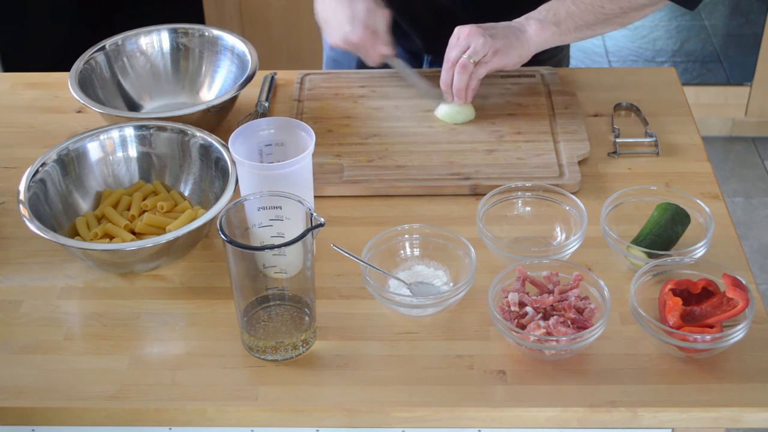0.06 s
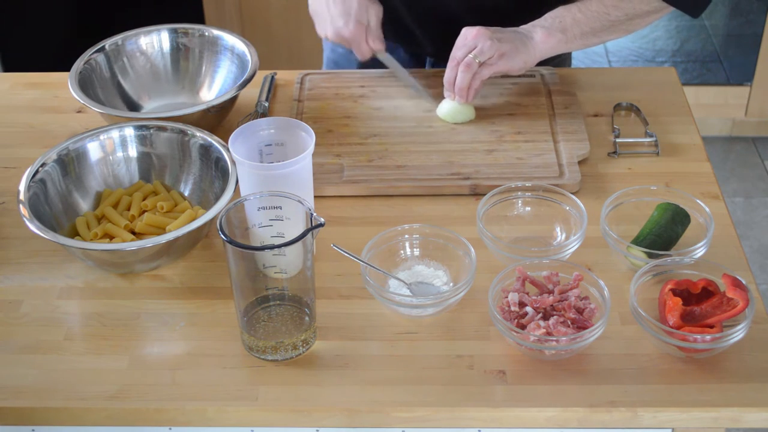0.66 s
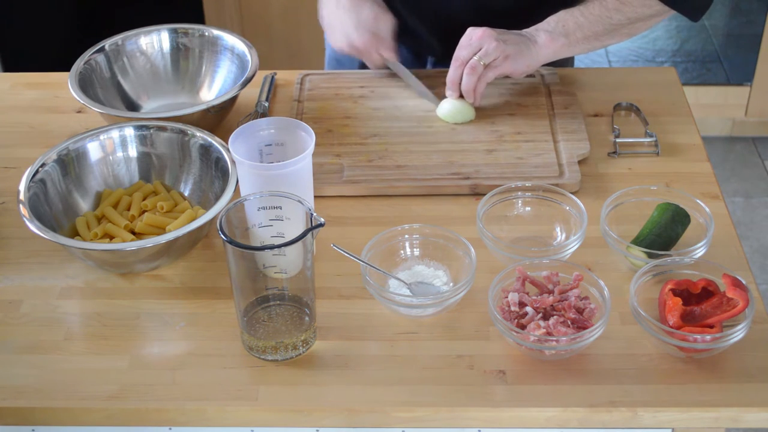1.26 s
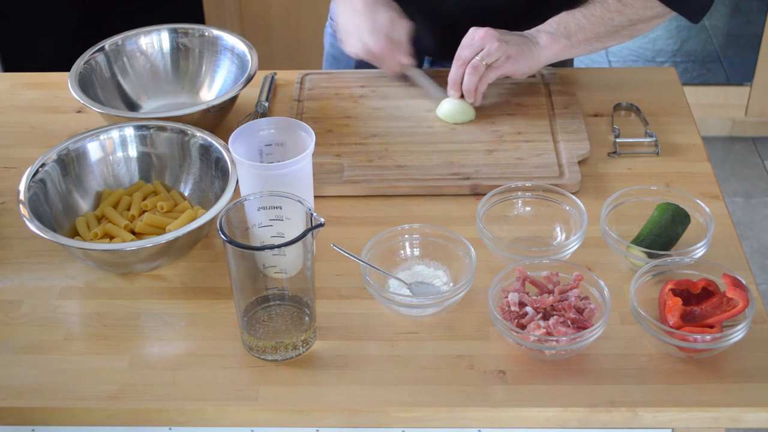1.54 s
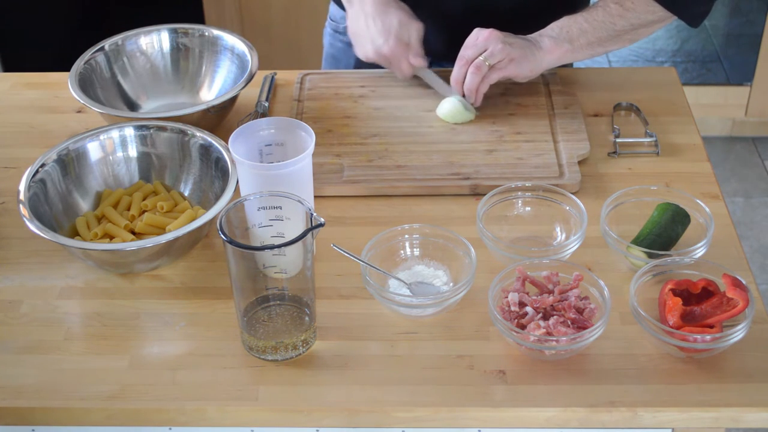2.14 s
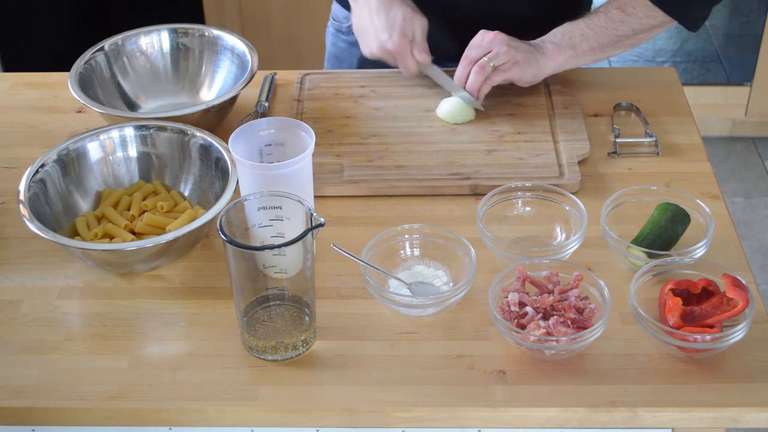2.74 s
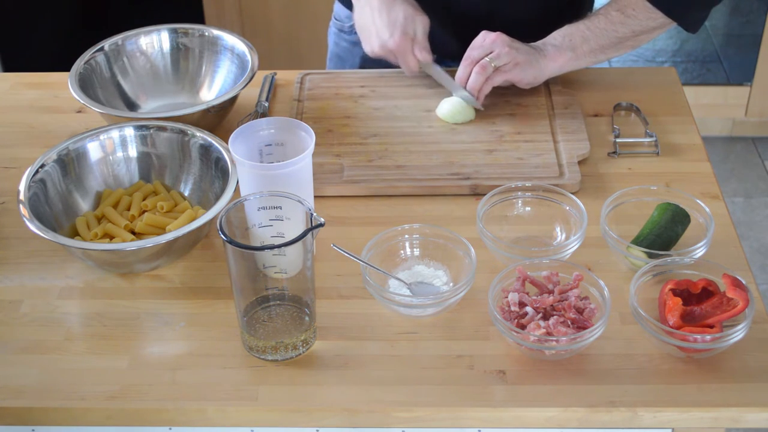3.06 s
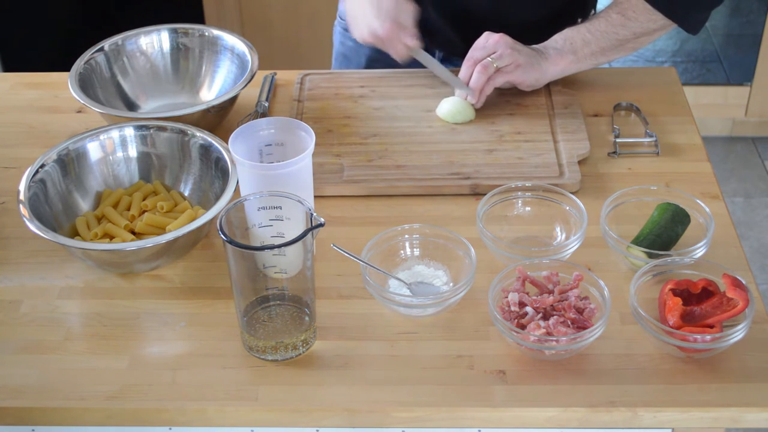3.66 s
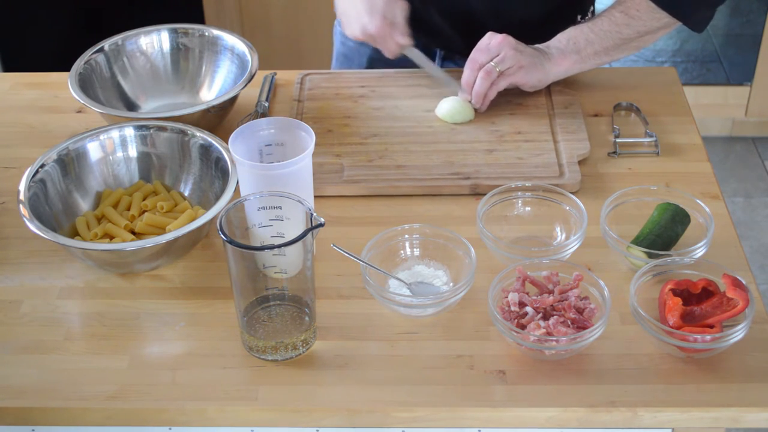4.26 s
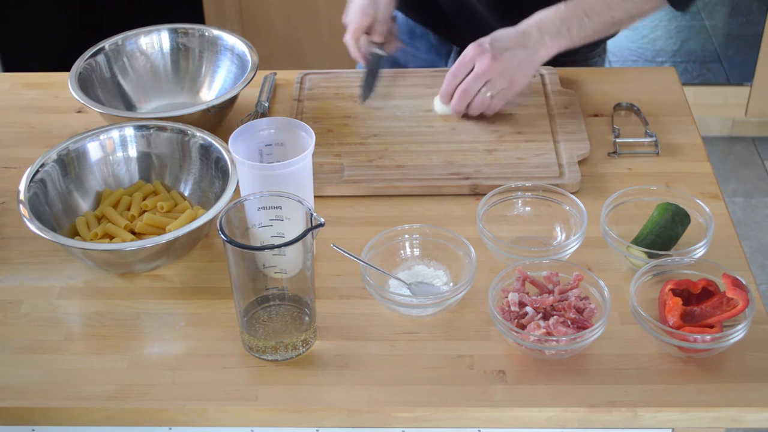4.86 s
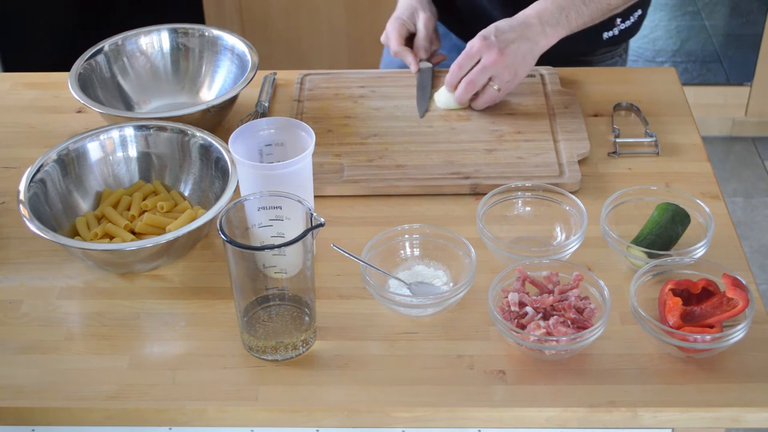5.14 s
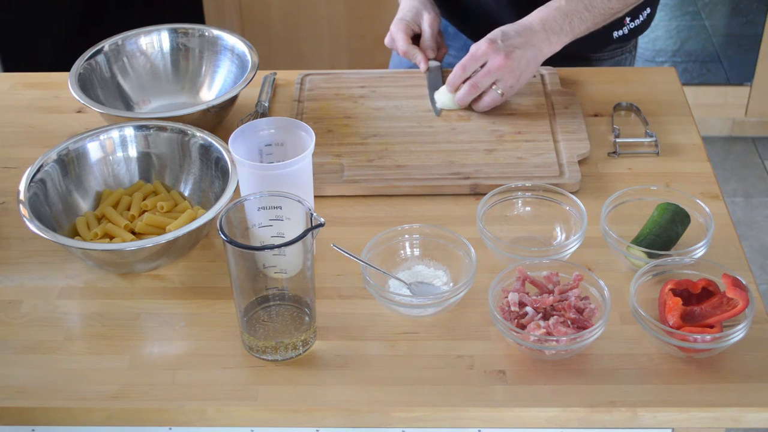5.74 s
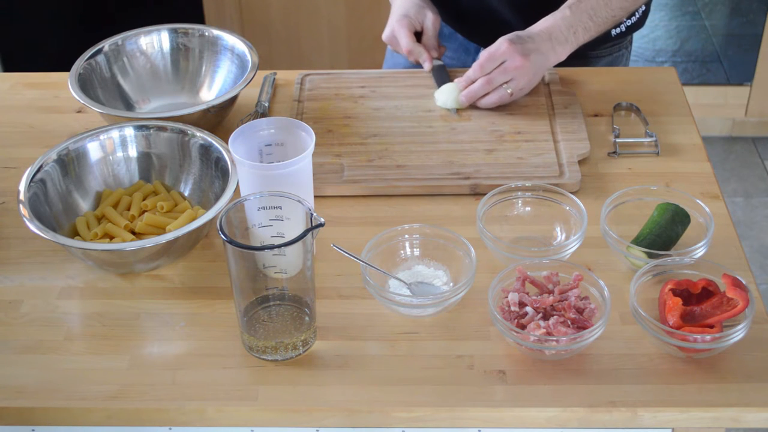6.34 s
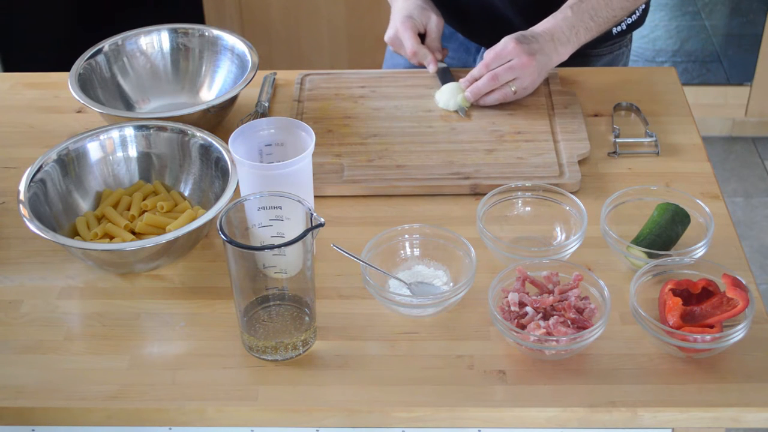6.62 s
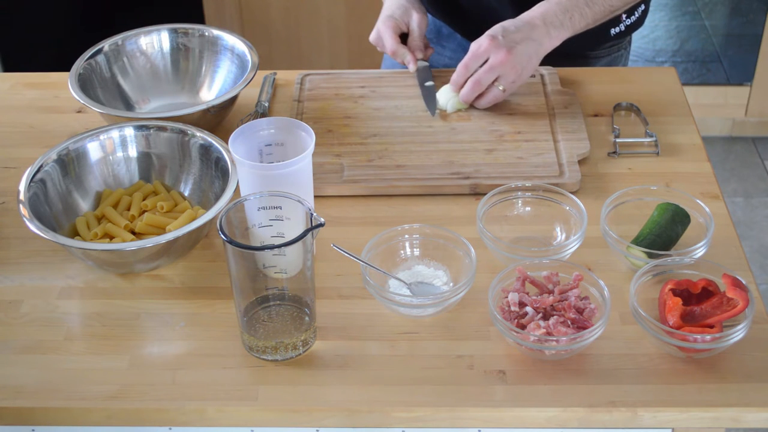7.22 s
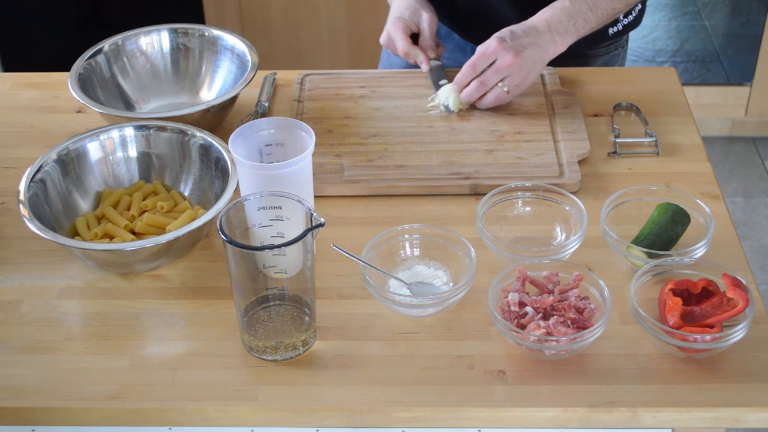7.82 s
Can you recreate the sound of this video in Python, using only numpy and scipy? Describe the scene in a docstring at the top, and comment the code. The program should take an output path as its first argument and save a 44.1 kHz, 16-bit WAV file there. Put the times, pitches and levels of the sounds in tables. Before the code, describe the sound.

Crunchy onion slicing opens at about three strokes a second, the blade knocking on a wooden chopping board and shaking the table beneath. Then the onion bumps softly on the wood, the knife tip scrapes and clicks twice, and the blade works through in small, much quieter crackling pushes. Heard from nearby, the kitchen adds a short echo, with faint steady fan noise and a very high electronic whine behind.

```python
"""A chef's knife slices an onion on a wooden board, on a kitchen table.
Fifteen quick strokes crunch as cells pop and layers burst; each ends in a knock that rings the board
and shakes the table. Hand and onion bump, the knife tip taps twice, and slow lengthwise cuts rasp on.
The room reverberates; a fan and a thin electronic whine lie behind."""
import sys
import numpy as np
from scipy import signal
from scipy.fft import rfft, irfft
from scipy.io import wavfile
from scipy.ndimage import uniform_filter1d

SR = 44100
rng = np.random.default_rng(int(sys.argv[2]) if len(sys.argv) > 2 else 0)


def dump(signal):
    """Clip the signal to [-1, 1] and save it as 16-bit WAV at the path in sys.argv[1]."""
    limited = np.clip(np.atleast_2d(signal).T, -1, 1)
    pcm = np.round(limited * 32767).astype(np.int16)
    wavfile.write(sys.argv[1], SR, pcm)


N = 356769


def gain_of(db):
    """Decibels to amplitude."""
    return 10 ** (np.asarray(db) / 20)


def unit_rms(x):
    """Scale to rms 1."""
    return x / np.sqrt(np.mean(x ** 2) + 1e-20)


def curve_at(points, hz):
    """Interpolate on a log-frequency axis."""
    freq_hz, value = np.transpose(points)
    return np.interp(np.log(hz + 1), np.log(freq_hz + 1), value)


def seconds(length_s):
    """Time axis."""
    return np.arange(int(length_s * SR)) / SR


def add(mix, start_s, sound):
    """Mix in place at start_s."""
    part = mix[max(round(start_s * SR), 0):][:len(sound)]
    part += sound[:len(part)]


def colour(x, spectrum, size=4096):
    """Minimum-phase filter of unit energy: the spectrum sets shape only."""
    hz = abs(np.fft.fftfreq(size, 1 / SR))
    log_gain = np.log(gain_of(np.maximum(curve_at(spectrum, hz), -100)))
    impulse = np.fft.ifft(np.exp(np.conj(signal.hilbert(log_gain)))).real[:size // 2]
    return signal.oaconvolve(x, impulse / np.linalg.norm(impulse))[:len(x)]


def resonate(x, hz, width_hz):
    """Double-pole resonance with steep skirts."""
    pole = np.exp((2j * np.pi * hz - np.pi * width_hz) / SR)
    return signal.lfilter([(1 - abs(pole)) ** 2], np.poly([pole, pole]), x).real


def swell(t, rise_s):
    """Envelope: peaks at 1 at rise_s, then decays."""
    return t / rise_s * np.exp(1 - t / rise_s)


# Fan air noise: freq_hz, gain_db
FAN_SPECTRUM = [(15, -45), (25, -16), (77, -4.5), (118, -10.5), (191, -12), (278, -13), (318, -9.5),
                (588, -13.5), (673, -14.5), (729, -12.5), (1810, -15.5), (2500, -16), (2930, -7.5),
                (3350, -15.5), (15000, -25.5)]
# Fan resonances: pitch_hz, width_hz, level_db
FAN_HUMS = [(311, 28, -72.5), (1580, 220, -62.5), (2880, 180, -65.5), (5260, 230, -68.5)]

def fan(air_db=-51):
    """Steady air noise with narrow hums."""
    air = gain_of(air_db) * unit_rms(colour(rng.standard_normal(N), FAN_SPECTRUM))
    for pitch_hz, width_hz, level_db in FAN_HUMS:
        air += gain_of(level_db) * unit_rms(resonate(rng.standard_normal(N), pitch_hz, width_hz))
    return air


def whine(pitch_hz=15681, level_db=-66.5):
    """Thin, steady electronic tone."""
    return gain_of(level_db) * unit_rms(np.sin(2 * np.pi * pitch_hz * np.arange(N) / SR))


# Room decay: freq_hz, t60_s
ROOM_DECAY = [(100, 0.5), (300, 0.49), (1000, 0.41), (3000, 0.38), (6000, 0.3), (14000, 0.18)]
# Early reflections: delay_s, gain
REFLECTIONS = [(.0133, .24), (.0165, .08), (.0225, .08), (.0305, .12)]

def kitchen(x, tail_db, build_s=0.0048):
    """Direct sound, near reflections and a dense tail whose treble dies first."""
    hz, t, bands = signal.stft(rng.standard_normal(SR), SR, nperseg=256)
    decay = gain_of(-60 * t / curve_at(ROOM_DECAY, hz)[:, None])
    tail = signal.istft(bands * decay, SR, nperseg=256)[1]
    tail *= 1 - np.exp(-(np.arange(len(tail)) / SR / build_s) ** 2)
    response = gain_of(tail_db) * tail / np.linalg.norm(tail)
    for delay_s, gain in REFLECTIONS:
        add(response, delay_s, np.array([gain]))
    return x + signal.fftconvolve(x, response)[:N]


def clatter(envelope, grit):
    """Short train of contacts under an envelope, spectrum flattened."""
    x = envelope * grit
    for _ in range(8):
        phase = np.angle(rfft(x * envelope ** .25))
        x = irfft(np.exp(1j * phase), len(envelope))
    return unit_rms(x) * np.sqrt(np.mean(envelope ** 2))


def impact(envelope, spectrum):
    """Coloured shower of contacts."""
    return colour(clatter(envelope, rng.standard_normal(len(envelope))), spectrum)


def ring(t, modes, scatter_db, detune):
    """Decaying modes; each blow shares its energy among them differently."""
    hz, db, t60_s = np.transpose(modes)[:, :, None]
    size, shift, phase = rng.standard_normal((3, len(modes), 1))
    weight = gain_of(db + scatter_db * size)
    waves = np.sin(2 * np.pi * (hz * (1 + detune * shift) * t + phase)) * gain_of(-60 * t / t60_s)
    return (weight * waves).sum(0) / np.linalg.norm(weight)


# Modes of the table under the board: pitch_hz, weight_db, t60_s
TABLE_MODES = [(70.8, -14, 0.93), (82.6, -8, 0.41), (104.5, -24, 0.3), (145, -4, 0.22), (188.8, 3.5, .16),
               (270, -0.5, 0.14), (340.8, 4.5, 0.25), (401.6, 2, .22)]

def table_thud(t, rise_s=0.014):
    """The table takes up a push slowly and rings low."""
    return ring(t, TABLE_MODES, scatter_db=-2.0, detune=0.0076) * (1 - np.exp(-(t / rise_s) ** 2))


# Modes of the board: pitch_hz, weight_db, t60_s
BOARD_MODES = [(576, -15, .15), (830, -10, .1), (900, -10, .12), (953, -11, .28), (1012, -9, .3),
               (1076, 3, .25), (1156, -3, .15), (1207, -6, .24), (1298, -9, .15), (1449, 0, .26),
               (1515, -6, .16), (2207, -4, .13), (2325, -7, .13), (2568, -4, .13), (2714, -2, .13),
               (2859, -8, .16), (2989, -7, .15), (3253, -5, .13), (3308, 0, .17), (3526, -2, .11),
               (3667, -2, .12), (4060, -7, .1), (4210, -8, .1)]

def board_ring(t, tilt):
    """The board rings, its modes weighted by the blow's tilt curve."""
    modes = np.array(BOARD_MODES, float)
    modes[:, 1] += curve_at(tilt, modes[:, 0])
    return ring(t, modes, scatter_db=-0.6, detune=0.00067) * (1 - np.exp(-t / 0.00029))


# Hand and onion on the board: start_s, level_db, table_db
BUMPS = [(3.576, -23, -43), (4.486, -21, -34), (5.187, -23.5, -33.5), (7.194, -32, -35.5)]
# Soft contact: freq_hz, gain_db
BUMP_SPECTRUM = [(29, -52), (50, -8), (246, -18), (337, -3), (468, -28.5), (542, -4), (768, -18), (975, -1),
                 (1150, -18), (1430, -15), (4000, -38), (5200, -62), (8800, -120)]

def hand_bumps(contact_gain_db=-9, thud_gain_db=4):
    """Soft bumps shake the table. Returns contacts, rings."""
    contacts, rings, t = np.zeros(N), np.zeros(N), seconds(.6)
    for start_s, level_db, table_db in BUMPS:
        bump = impact(swell(t, 0.0064), BUMP_SPECTRUM)
        add(contacts, start_s, gain_of(level_db + contact_gain_db) * bump)
        add(rings, start_s, gain_of(table_db + thud_gain_db) * table_thud(t, rise_s=0.01))
    return contacts, rings


# Knife tip on the board: start_s, level_db, table_db
TIP_TAPS = [(5.607, -14.5, -35.5), (5.873, -13.5, -36.5)]
# Tip contact: freq_hz, gain_db
TIP_SPECTRUM = [(88, -37), (150, -21), (675, -20), (1030, -3.5), (1240, -9), (1570, 0.5), (1780, -8.5),
                (2300, -3), (3990, -13.5), (4380, -23), (4800, -19), (10200, -46), (12000, -41),
                (15600, -67), (22000, -120)]
# Tip's weighting of the board modes: freq_hz, gain_db
TIP_TILT = [(900, 2.5), (1200, -8), (1500, 5), (2300, 1), (3300, -14)]

def tip_taps(click_gain_db=-4, ring_gain_db=-9, thud_gain_db=4, thud_lag_s=0.0151):
    """The tip clicks on the wood; board and table ring. Returns clicks, rings."""
    clicks, rings, t = np.zeros(N), np.zeros(N), seconds(.6)
    envelope = np.exp(-t / 0.00176) + 0.45 * swell(t, .004)
    for start_s, level_db, table_db in TIP_TAPS:
        add(clicks, start_s, gain_of(level_db + click_gain_db) * impact(envelope, TIP_SPECTRUM))
        add(rings, start_s, gain_of(level_db + ring_gain_db) * board_ring(t, TIP_TILT))
        add(rings, start_s + thud_lag_s, gain_of(table_db + thud_gain_db) * table_thud(t))
    return clicks, rings


# Tip scrapes: centre_s, length_s, level_db
TIP_DRAGS = [(5.368, 0.17, -47.5), (5.482, 0.057, -40.5), (5.749, 0.075, -35.5), (6.008, 0.066, -35.5)]

def tip_drags(gain_db=-3):
    """The tip drags over the wood in short swells of noise."""
    force = np.zeros(N)
    for centre_s, length_s, level_db in TIP_DRAGS:
        add(force, centre_s - length_s / 2, gain_of(level_db + gain_db) * np.hanning(int(length_s * SR)))
    return colour(force * rng.standard_normal(N), TIP_SPECTRUM)


def cell_pops(rate_hz, spread_db):
    """Onion cells pop as random clicks; positive spread makes a few much louder."""
    size = gain_of(spread_db * np.minimum(rng.exponential(1, N), 4))
    return unit_rms(size * rng.choice([-1, 1], N) * (rng.random(N) < rate_hz / SR))


def clumps(depth_db):
    """Gain flutter: cells tear in clumps a few milliseconds long."""
    return gain_of(depth_db * unit_rms(uniform_filter1d(rng.standard_normal(N), size=180)))


# Lengthwise pushes of the blade: start_s, length_s, level_db
PUSHES = [(4.74, 0.21, -48.5), (5.12, 0.34, -55), (5.455, .052, -45), (5.582, 0.057, -41.5),
          (5.704, .058, -43), (5.83, 0.072, -38.5), (5.97, 0.082, -41.5), (6.108, .088, -37.5),
          (6.249, 0.058, -38.5), (6.372, 0.094, -35), (6.51, 0.062, -40), (6.628, 0.08, -38),
          (6.757, 0.094, -48.5), (6.857, 0.089, -40), (7.34, 0.071, -46.5), (7.473, 0.048, -42.5),
          (7.585, 0.095, -35), (7.716, 0.078, -40), (7.85, 0.09, -36), (7.975, 0.091, -44)]
# Lengthwise rasp: freq_hz, gain_db
RASP_SPECTRUM = [(290, -37), (500, -31), (553, -0.5), (678, -8.5), (1050, 8), (1460, -10.5), (1600, -2),
                 (2230, 3), (2570, -5.5), (3700, 4.5), (7310, 3), (9770, 8.5), (16000, -12)]

def slow_cuts(gain_db=-4, attack_s=0.0085, build_db=4, release_s=0.02):
    """Each crackling push bites, builds as the blade sinks, and lets go."""
    force = np.zeros(N)
    for start_s, length_s, level_db in PUSHES:
        t = seconds(length_s + .15)
        bite = 1 - np.exp(-t / attack_s)
        build = gain_of(build_db * (np.minimum(t / length_s, 1) - 1))
        release = np.exp(-np.maximum(t - length_s, 0) / release_s)
        add(force, start_s, gain_of(level_db + gain_db) * bite * build * release)
    return colour(force * clumps(depth_db=1.5) * cell_pops(rate_hz=9000, spread_db=5), RASP_SPECTRUM)


def landing_after(start_s):
    """Time at which a stroke reaches the board."""
    return min(chop[0] for chop in CHOPS if chop[0] > start_s)


# Quick strokes through the layers: start_s, flesh_db, outer_db, inner_delay_s, inner_db, jolt_re_snap_db
STROKES = [(0.1795, -32.5, -21, .018, -23, -9.5), (0.5137, -31, -15, 0.036, -16, -11.5),
           (0.8382, -31, -19.5, 0.04, -16, -21), (1.163, -29.5, -18.5, 0.041, -18.5, -13),
           (1.4932, -29.5, -17.5, 0.03, -17, -6), (1.799, -29, -20, 0.038, -22, -3),
           (2.124, -29.5, -18, 0.036, -16, -4.5), (2.448, -31, -20.5, .035, -22, -4.5),
           (2.7715, -31.5, -18.5, 0.025, -15, -4), (3.0963, -32, -23.5, 0.0297, -16.5, -4),
           (3.432, -33, -28, 0.018, -15, -7), (3.7583, -32, -22.5, 0.022, -22.5, -7),
           (4.0544, -31, -29.5, 0.034, -19, -25), (4.378, -31, -32.5, 0.032, -36, -5)]

def blade_pressure(opening_db=-31.5, graze_db=-9.5, bite_s=0.0045, settle_s=.044):
    """Each stroke bites into the flesh, presses until it lands, and settles."""
    pressure, t = np.zeros(N), seconds(.3)
    add(pressure, 0, gain_of(opening_db) * np.exp(-(t / settle_s) ** 2))  # first stroke lands at 0 s
    for start_s, flesh_db, outer_db, inner_delay_s, _, _ in STROKES:
        travel_s = landing_after(start_s) - start_s
        # a gentle entry only grazes until the inner layer gives
        level_db = np.where(t < inner_delay_s, min(flesh_db, outer_db + graze_db), flesh_db)
        bite = 1 - np.exp(-t / bite_s)
        settle = np.exp(-(np.maximum(t - travel_s, 0) / settle_s) ** 2)
        add(pressure, start_s, gain_of(level_db) * bite * settle)
    return pressure


# Lone fibres snapping during the slow cuts: start_s, level_db
FIBRES = [(4.676, -34), (5.1297, -38.5), (6.4203, -39), (7.3833, -28), (7.4165, -27.5)]

def layer_snaps(lowest_lead_s=0.011):
    """Envelopes of bursting layers and fibres, and of their jolts to the board."""
    snaps, jolts, t = np.zeros(N), np.zeros(N), seconds(.15)
    # start_s, level_db, rise_s, jolt_re_snap_db
    bursts = [(start_s, level_db, 0.0033, -18) for start_s, level_db in FIBRES]
    for start_s, flesh_db, outer_db, inner_delay_s, inner_db, jolt_db in STROKES:
        outer = (start_s, outer_db, 0.0054, jolt_db)
        inner = (start_s + inner_delay_s, inner_db, 0.0046, jolt_db)
        lowest = (landing_after(start_s) - lowest_lead_s, flesh_db + 9.5, 0.0047, -15)
        bursts += [outer, inner, lowest]
    for start_s, level_db, rise_s, jolt_db in bursts:
        add(snaps, start_s, gain_of(level_db) * swell(t, rise_s))
        add(jolts, start_s, gain_of(level_db + jolt_db) * swell(t, rise_s))
    return snaps, jolts


# Onion crunch: freq_hz, gain_db
CRUNCH_SPECTRUM = [(59, -35), (100, -4), (193, -19.5), (249, -6.5), (461, -8), (705, -11), (818, -8),
                   (1060, 0.5), (1450, -3.5), (1760, -5), (2690, -6.5), (8280, -9.5), (9410, -5.5),
                   (10700, -8), (16000, -32.5)]

def quick_cuts(flesh_gain_db=-5, snap_gain_db=-8, jolt_gain_db=-9, rock_gain_db=-22, fade_db_per_s=0.5):
    """Cells pop all the way down each stroke, in a rush where a layer gives way."""
    pressure = blade_pressure()
    snaps, jolts = layer_snaps()
    flesh = gain_of(flesh_gain_db) * pressure * clumps(depth_db=1.5)
    flesh *= cell_pops(rate_hz=4500, spread_db=4)
    # a bursting layer is brighter than the flesh and knocks on the wood
    bright_pops = signal.lfilter([1, -0.44], [1], cell_pops(rate_hz=10000, spread_db=-1))
    layers = gain_of(snap_gain_db) * snaps * unit_rms(bright_pops)
    wood = colour(gain_of(jolt_gain_db) * jolts * cell_pops(rate_hz=2900, spread_db=-1.5), CRACK_SPECTRUM)
    # uneven pushing rocks the table's lowest mode, less as the onion shrinks
    push = pressure * gain_of(-fade_db_per_s * np.arange(N) / SR) * rng.standard_normal(N)
    rocking = unit_rms(resonate(push, TABLE_MODES[0][0], width_hz=10.6)) * np.std(pressure)
    return colour(flesh + layers, CRUNCH_SPECTRUM) + wood + gain_of(rock_gain_db) * rocking


# Edge landing on the board: start_s, level_db, hardness_db, table_db, body_db
CHOPS = [(0.0, -11.5, -4.5, -44.5, -18), (0.294, -7.5, -3.5, -45, -17), (0.615, -7, -5, -36.5, -18),
         (0.947, -7.5, -4.5, -35, -18), (1.267, -7, -4, -36, -18.5), (1.594, -9.5, -5.5, -36, -17.5),
         (1.906, -9.5, -4.5, -33.5, -16), (2.23, -8.5, -3.5, -35.5, -15.5), (2.558, -11, -3.5, -36, -15.5),
         (2.884, -8.5, -3.5, -41.5, -18), (3.207, -6, -1.5, -32, -17.5), (3.547, -19, -8, -39.5, -14),
         (3.864, -13, -7, -47, -22.5), (4.169, -6.5, -3, -44.5, -21.5), (4.447, -12, -9, -32.5, -20.5),
         (4.759, -25, -16.5, -54, -6), (5.147, -33.5, -14, -41, -21)]
# Edge on wood: freq_hz, gain_db
CRACK_SPECTRUM = [(100, -49.5), (400, -16.5), (700, -13.5), (850, 0), (1100, 3), (1480, -1.5), (1850, -15),
                  (2150, -3.5), (2700, -2.5), (3050, -4), (3550, -2), (3880, -14), (4150, -10),
                  (4900, -27.5), (5500, -20), (6800, -29.5), (9000, -33), (15000, -51)]

def chops(crack_gain_db=-2, ring_gain_db=-4, thud_gain_db=10, likeness=.8, thud_lag_s=.028):
    """The edge cracks on the board; the follow-through shakes the table. Returns cracks, rings."""
    cracks, rings = np.zeros(N), np.zeros(N)
    t, contact_t = seconds(.6), seconds(.08)
    hz, crack_db = np.transpose(CRACK_SPECTRUM)
    treble_weight = curve_at([(1400, 0.037), (2700, 0.63), (3700, 2.0), (4500, 2.35)], hz)
    body_weight = curve_at([(500, 1.0), (950, 0.052)], hz)
    # one point of the edge touches first, then the rest rolls down
    landing = 0.42 * np.exp(-contact_t / 0.00049) + swell(contact_t, 0.0027)
    shared_grit = rng.standard_normal(len(landing))  # nearly the same spot each time
    for start_s, level_db, hardness_db, table_db, body_db in CHOPS:
        grit = likeness * shared_grit + np.sqrt(1 - likeness ** 2) * rng.standard_normal(len(landing))
        # a blow cushioned by onion loses treble
        tilt_db = treble_weight * (hardness_db + 4) + body_weight * (body_db + 22)
        crack = colour(clatter(landing, grit), np.c_[hz, crack_db + tilt_db])
        add(cracks, start_s - .0005, gain_of(level_db + crack_gain_db) * crack)
        add(rings, start_s, gain_of(level_db + ring_gain_db) * board_ring(t, np.c_[hz, tilt_db]))
        add(rings, start_s + thud_lag_s, gain_of(table_db + thud_gain_db) * table_thud(t))
    return cracks, rings


def scene():
    """Knife work in the room, over fan and whine; mono."""
    cracks, chop_rings = chops()
    clicks, tap_rings = tip_taps()
    bumps, bump_rings = hand_bumps()
    knocks = kitchen(cracks + clicks + bumps, tail_db=-3)
    wood = kitchen(chop_rings + tap_rings + bump_rings, tail_db=-13)
    onion = kitchen(quick_cuts() + slow_cuts() + tip_drags(), tail_db=-3.5)
    return (knocks + wood + onion + fan() + whine())[None]


def record(dry):
    """Soft limit at full scale, then low-pass."""
    limited = dry / (1 + dry ** 8) ** (1 / 8)
    lowpass = signal.firwin(511, cutoff=16100, window=("kaiser", 9), fs=SR)
    return signal.oaconvolve(limited, lowpass[None], "same")


dry = scene()
out = record(dry)
dump(out)
```